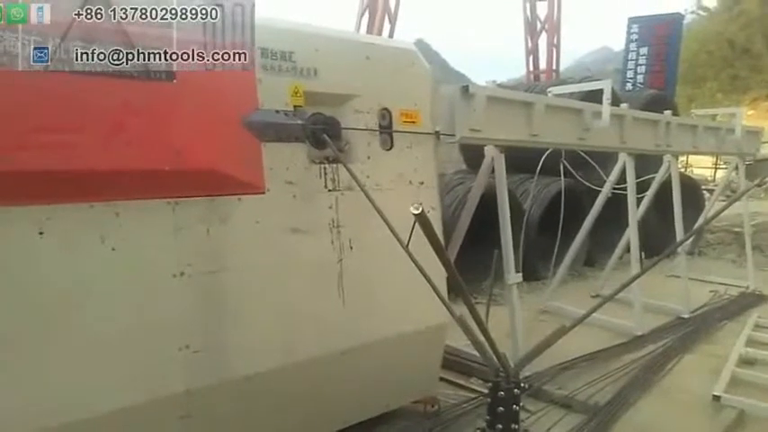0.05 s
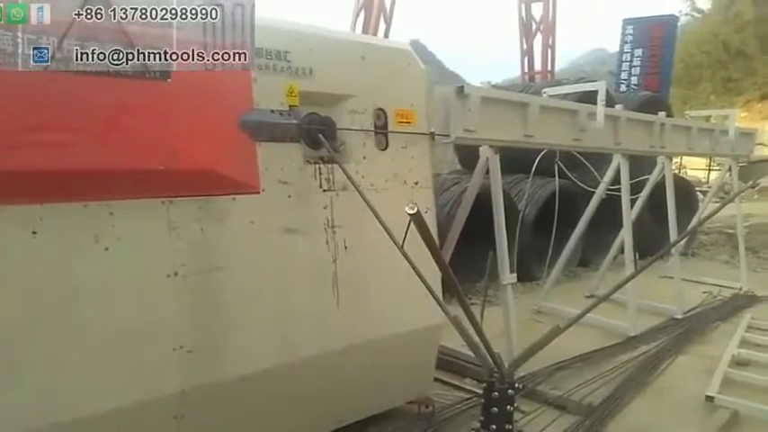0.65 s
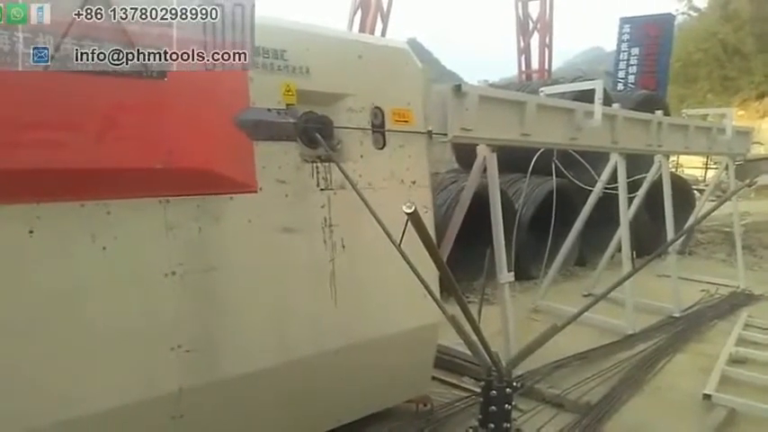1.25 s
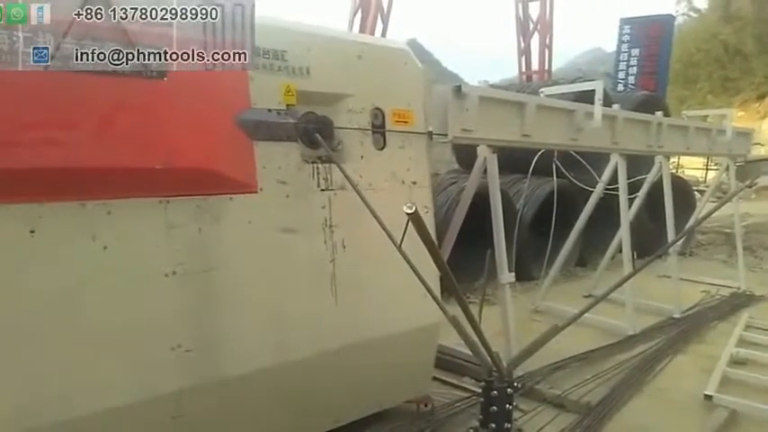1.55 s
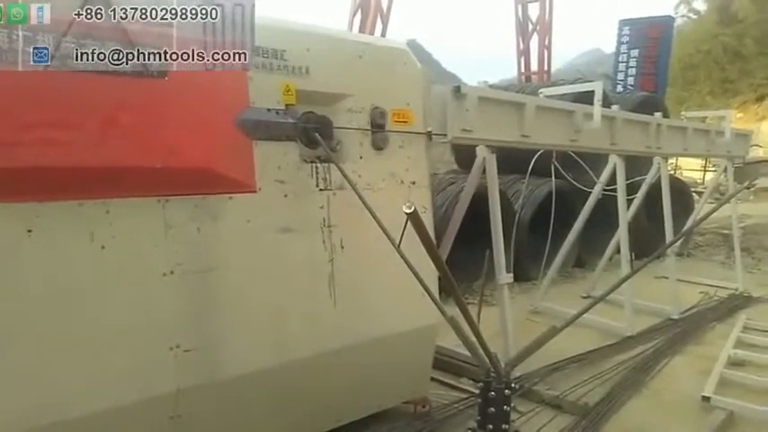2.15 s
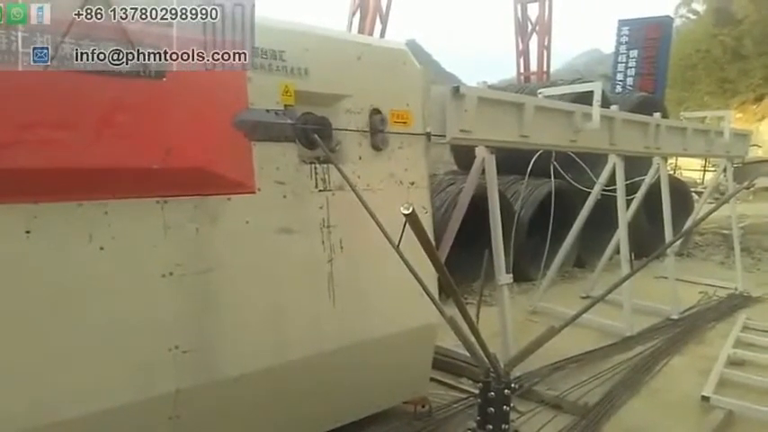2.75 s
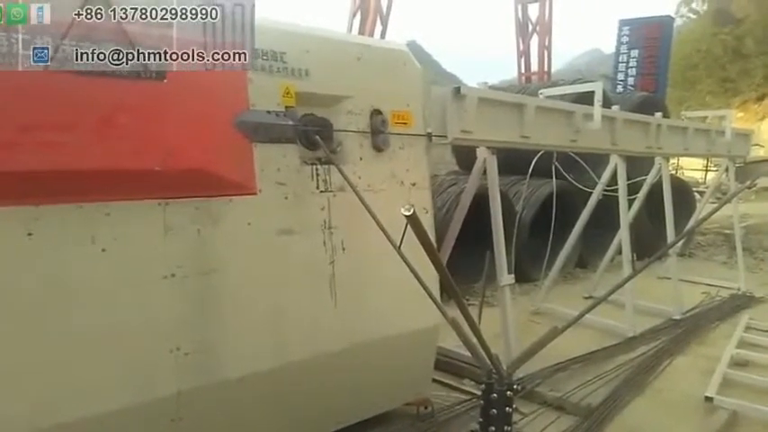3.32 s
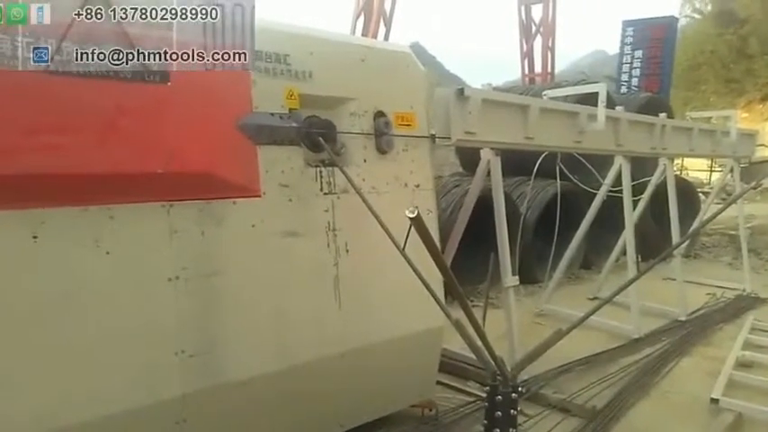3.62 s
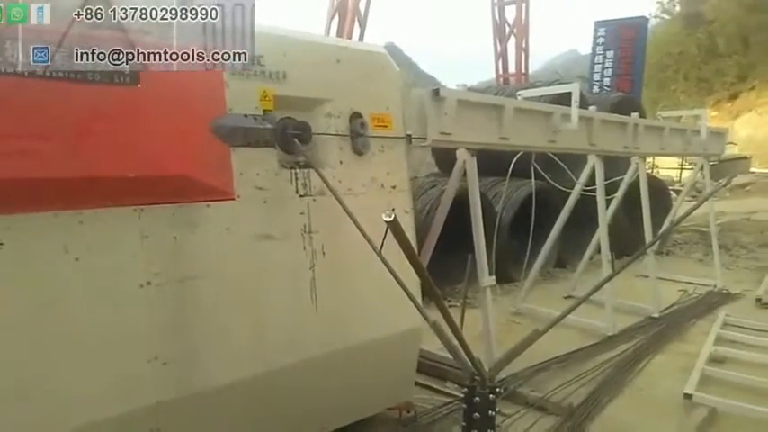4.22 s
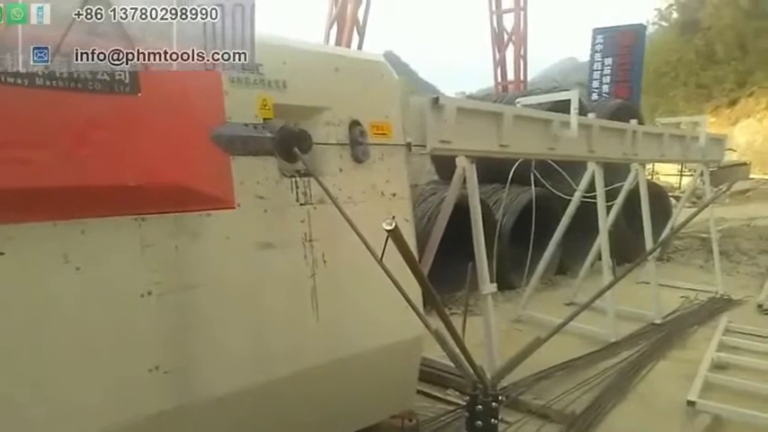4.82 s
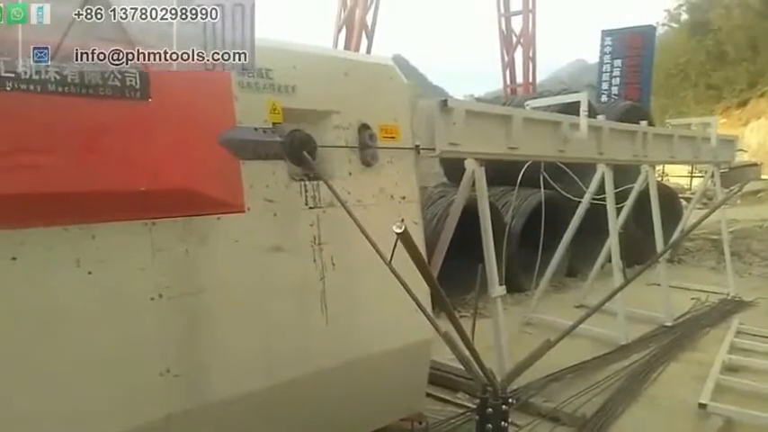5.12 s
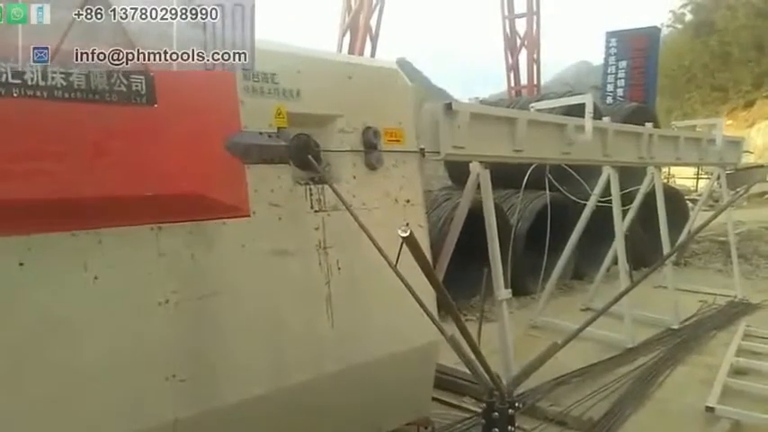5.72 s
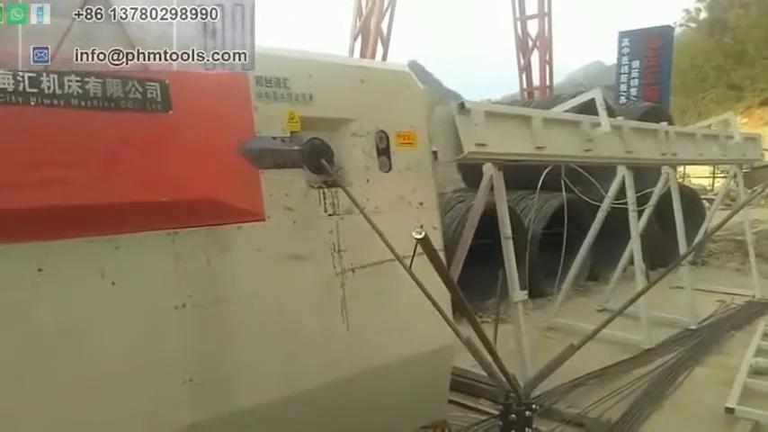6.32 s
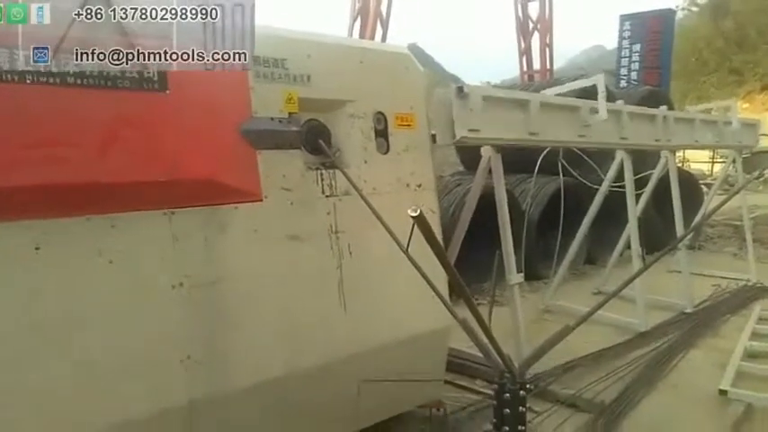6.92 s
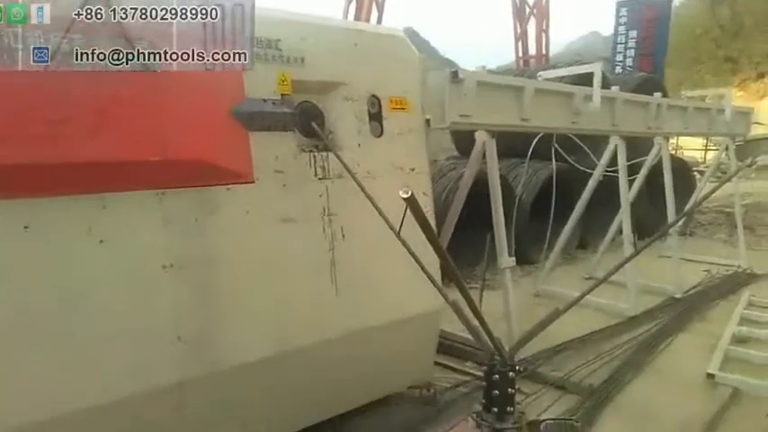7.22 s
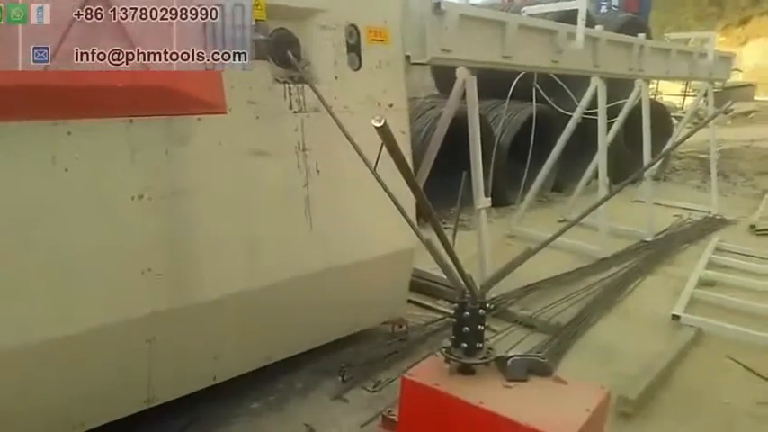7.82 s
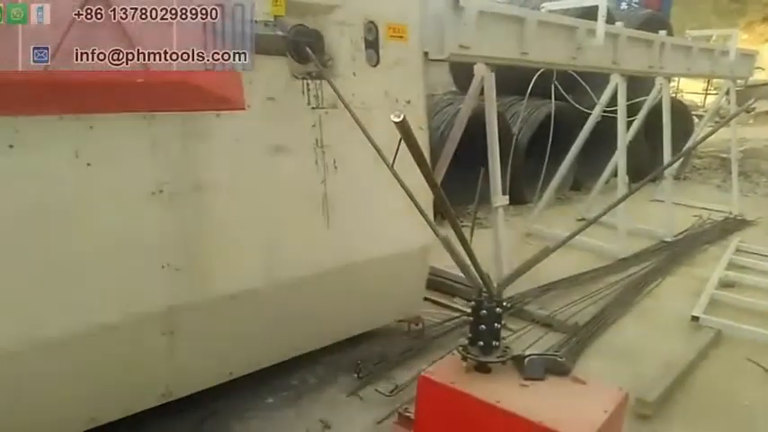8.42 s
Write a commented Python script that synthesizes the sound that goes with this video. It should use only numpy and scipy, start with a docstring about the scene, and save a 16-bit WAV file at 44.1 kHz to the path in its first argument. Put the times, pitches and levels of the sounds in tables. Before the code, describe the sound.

A bar-bending machine hums and roars through a long feed, pauses, then works in short strokes with steel scraping and clanking.

```python
"""Bar bender in an open yard

Close by, an automatic bender feeds steel bar, slows and stops, then pushes and bends it in short
strokes. Its drive hums and roars through a sheet steel cabinet; the ribbed bar scrapes, clashes and
rings in rollers and guides. Draughts buffet the hand-held phone, whose two unlike microphones each
have their own limiter."""
import sys
import numpy as np
from scipy.fft import rfft, irfft, next_fast_len
from scipy.io import wavfile
from scipy.ndimage import uniform_filter1d, minimum_filter1d, map_coordinates

SR = 44100
rng = np.random.default_rng(int(sys.argv[2]) if len(sys.argv) > 2 else 0)


def log_audio(samples):
    """Write samples as a 16-bit WAV file to the path given in sys.argv[1]."""
    # one column per channel
    frames = np.atleast_2d(samples).T
    # limit to full scale, then quantise
    limited = np.clip(frames, -1, 1)
    pcm = np.round(limited * 32767).astype(np.int16)
    wavfile.write(sys.argv[1], SR, pcm)


N = 373086

# the long feed's roar, rasp and grating, a row each: (level at full speed [dB], exponent of speed)
LONG_FEED = [(-17.5, 0.75), (-14, 1.8), (-20.5, 6.1)]
# short pushes and bends: (start [s], end [s], rise [s], base t60 [s], roar [dB], rasp [dB], grating [dB])
WORK_STROKES = [(2.353, 2.707, 0.061, .35, -55.5, -51, -62), (2.701, 2.753, 0.029, 0.35, -36.5, -32, -32),
                (3.037, 3.139, 0.12, 0.42, -8.5, 1, -8), (3.23, 3.82, 0.096, 3.1, -37, -23, -32.5),
                (3.318, 3.545, 0.2, 0.7, -14, -7, -17), (4.107, 4.261, 0.032, 2.8, -44, -28.5, -49),
                (4.155, 4.192, 0.014, 0.79, -30.5, -40, -42), (4.377, 4.464, 0.043, 1.7, -56, -28, -35.5),
                (4.523, 4.78, 0.16, 0.86, -42, -24, -33.5), (4.863, 4.916, 0.018, 1.05, -52, -28, -39.5),
                (4.975, 5.075, 0.012, 2.8, -39, -28.5, -27.5), (5.12, 5.253, 0.031, 4.6, -29, -21, -27.5),
                (5.282, 5.336, 0.05, 1.34, -23, -19, -16.5), (5.393, 5.644, 0.28, 3.9, -54.5, -15.5, -36),
                (5.826, 6.108, 0.045, 2.8, -31, -23, -28.5), (6.017, 6.064, 0.026, 0.18, -43, -18, -24),
                (6.161, 6.378, 0.021, 0.3, -25, -21.5, -19), (6.353, 6.57, 0.099, 3.5, -24, -15, -15),
                (6.512, 6.815, 0.27, 2.07, -22.5, 0, -22), (6.946, 7.184, 0.082, 1.35, -32, -11, -39),
                (7.317, 7.507, 0.085, 1.9, -56.5, -27, -44), (7.915, 8.021, 0.046, 1.3, -44, -24.5, -37),
                (8.081, 8.46, 0.18, 0.56, -22, -21.5, -29.5)]
# shares of a stroke's base t60: (roar [ratio], rasp [ratio], grating [ratio])
T60_SHARES = [0.73, 0.35, 0.51]
# the drive taking up or dropping its load: (time [s], level [dB], t60 [s])
LOAD_JOLTS = [(1.903, -10.5, 0.21), (2.72, -30.5, 0.49), (3.015, -12, 0.31), (3.19, -16.5, 0.53),
              (4.103, -32.5, 0.42), (4.474, -22, 0.28), (4.992, -18, 0.96), (5.165, -12.5, 0.21),
              (7.034, -10, 0.61), (8.104, -21.5, 0.87)]
# gear hum: (time [s], first order [dB], second order [dB], third order [dB])
GEAR_ORDERS = [(0.0, -28, -40, -41), (0.1, -23, -40, -40), (0.25, -35, -37.5, -27), (0.52, -45, -38, -35.5),
               (0.72, -31.5, -35.5, -37.5), (1.0, -29.5, -33, -51), (1.16, -39, -35, -30.5),
               (1.3, -33, -37, -35), (1.45, -30.5, -26, -36), (1.77, -48, -51, -50),
               (1.93, -31, -31, -33.5)]
# resonances of the machine and the bar: (frequency [Hz], width [Hz], level [dB])
CABINET_MODES = [(404.6, 13, 7.5), (592, 152, 1.5), (893, 37, 0), (1245, 330, 0), (1476, 51, -0.5),
                 (2840, 170, -24)]
ROLLER_TONES = [(616, 30, -16), (903, 13.93, -14), (1317, 18, -8.5), (1347, 45, -11), (2840, 120, -13.5)]
BAR_MODES = [(1620, 400, -10), (2190, 120, -11), (3090, 82, -10.5)]
# noise spectra: (frequency [Hz], relative density [dB])
ROAR_SPECTRUM = [(80, -27), (170, -6), (330, -0.5), (490, -12), (750, -0.5), (1100, -5), (1500, -8),
                 (1900, -8), (3000, -8), (5000, -20.5), (12000, -22.5)]
SLIDE_SPECTRUM = [(600, -52), (1200, -14), (1500, -4), (1800, -0.5), (3300, 0), (4500, 2), (9700, 2.5),
                  (12000, -2.5)]
HISS_SPECTRUM = [(400, -36), (2000, -40), (3500, -13), (5200, 0), (8000, -1.5), (9600, -6), (10700, 8),
                 (12000, 6)]
FLICK_SPECTRUM = [(1500, -45), (4000, -15), (6500, -1), (8200, 0), (9600, -4.5), (11000, 6.5), (12000, -2)]
GRIND_SPECTRUM = [(800, -56), (1200, -20), (1450, -9), (1750, -11.5), (2500, -10.5), (3500, -14),
                  (6000, -15.5), (12000, -28.5)]
RUMBLE_SPECTRUM = [(20, -37), (35, -12.5), (65, 5), (100, -2.5), (160, -7), (290, -11.5), (900, -41)]
YARD_SPECTRUM = [(20, -23), (80, 12), (350, 10), (700, -7), (1800, -4), (5000, -25), (12000, -10)]
THUMP_SPECTRUM = [(25, -28), (70, 13), (150, 2), (300, -24), (480, -48), (1200, -52)]
FLUTTER_SPECTRUM = [(80, -8), (190, 5), (350, -1.5), (520, -12), (1200, -47)]
# the scrape turns to a keener hiss as the bar is bent off: (time [s], share of power [0-1])
HISS_SHARE = [(6.45, 0.37), (6.7, 0.67), (7.15, 0.78), (7.5, 0.63), (8.2, 0.9)]
# the bar's contacts: (time [s], level [dB], t60 [s])
STEEL_CLASHES = [(1.875, -16, 0.35), (2.506, -30.5, 0.54), (2.702, -25, 0.28), (2.988, -19, 0.58),
                 (3.019, -8.5, 0.13), (3.762, -15, 0.13), (4.159, -13, 0.1), (4.53, -20, 0.35),
                 (4.991, -15.5, 0.11), (5.318, -18, 0.18), (6.182, -1, 0.14), (6.313, -9.5, 0.33),
                 (7.92, -39, 0.2)]
END_FLICKS = [(2.27, -40.5, 0.27), (7.375, -19, 0.24), (7.442, -14, 0.19), (7.69, -32, 0.4),
              (7.741, -29, 0.19), (7.919, -32.5, 0.2)]  # free end against the faceplate
TOOL_GRATES = [(1.304, -13.5, 0.89), (4.101, -30.5, 0.28), (4.994, -23, 0.67), (5.17, -16, 0.23),
               (6.185, -14, 0.294), (6.426, -15.5, 1.2), (8.107, -21, 0.37)]  # catching on a tool
# draughts across the phone: (start [s], end [s], level [dB])
PHONE_DRAUGHTS = [(2.007, 2.505, -46), (3.5, 3.62, -44.5), (4.17, 4.495, -35), (4.943, 5.44, -29),
                  (6.134, 6.766, -20.5), (6.798, 7.246, -28), (8.02, 8.458, -20)]
# squeals and groans in the rollers: (start [s], end [s], frequency [Hz], width [Hz], level [dB])
BAR_SQUEALS = [(0.288, 0.417, 1543, 203, -13), (1.288, 1.364, 1532, 235, -12),
               (2.118, 2.25, 1620, 150, -51), (2.71, 2.79, 1343, 468, -32.5), (3.43, 3.475, 406, 60, -12.5),
               (4.1, 4.908, 760, 69.9, -45), (4.977, 5.153, 1196, 306, -27.5),
               (5.33, 5.479, 1220, 240, -23.5), (5.84, 6.21, 996, 502, -28.5),
               (6.42, 6.658, 2153, 745, -19)]
# puffs on the microphones: (time [s], level [dB], t60 [s], left minus right [dB], flutter re thump [dB])
AIR_PUFFS = [(2.275, -29, 0.25, -1, -26), (4.215, -23, 0.39, 17, -5), (4.483, -18.5, 0.14, 22, -16),
             (5.197, -15, 0.19, 4, -17), (5.303, -18, 0.15, 10, -22), (6.126, -8.5, 0.12, 2.5, -2.5),
             (6.325, -20, 0.39, -14, 7.5), (6.397, -12, 0.18, -9, -8), (6.52, -15.5, 0.31, -10, 4),
             (6.595, -10.5, 0.19, -15, 3), (6.713, -12.5, 0.14, -14, 9), (7.294, -22, 0.18, 20, -10),
             (7.5, -10.5, 0.12, 15, -14), (7.607, -10, 0.15, 11, -16.5), (7.7, -19.5, 0.22, 19, -26),
             (7.81, -17.5, 0.14, 28, -30), (7.925, -21, 0.19, 15, -27), (8.047, -12.5, 0.16, 20, -11.5),
             (8.136, -8, 0.13, 14, -17)]
# light catches snapping in, and the bar knocking on a bending tool: (time [s], level [dB])
CATCH_CLICKS = [(2.387, -45), (2.507, -47)]
TOOL_CLANKS = [(4.995, -21), (5.176, -19.5), (6.184, -21.5), (7.038, -23)]
# what they ring with: (frequency [Hz], width [Hz], level [dB], t60 [s])
CATCH_MODES = [(2620, 730, 2, 0.16), (3830, 900, -13, .2), (5500, 1000, -4, 0.2)]
TOOL_MODES = [(1260, 38, -1.5, 0.25), (1717, 34, -10, 0.13), (1980, 35, -3, 0.07), (2300, 27, -1, 0.13),
              (3150, 30, -13, .12)]
# the whine of a guide: (time [s], pitch [Hz], level [dB])
GUIDE_WHINE = [(3.6, 1580, -70), (3.76, 1636, -30), (3.92, 1647, -38), (4.07, 1622, -46),
               (4.2, 1620, -33.5), (4.5, 1655, -42.5), (4.68, 1627, -36.5), (4.92, 1652, -43),
               (5.53, 1624, -50), (5.62, 1614, -26.5), (5.83, 1620, -39.5), (6.3, 1644, -40),
               (6.85, 1680, -28), (7.2, 1680, -37), (7.45, 1640, -44.5), (7.8, 1656, -57), (8.3, 1642, -36)]
# the guide's modes: (frequency over the whine's pitch [ratio], width [Hz], level [dB])
WHINE_MODES = [(1, 58, 0.5), (0.925, 150, -7)]
# which microphone port a sound favours: (time [s], left minus right [dB])
SCRAPE_BALANCE = [(3.55, -2.5), (3.75, 3), (4.9, 7.5), (5.1, -1), (5.6, 5), (6.1, -2), (7.5, 0), (8.3, 8)]
RUMBLE_BALANCE = [(3.7, 12), (5.0, 2), (6.1, -0.5), (6.6, -8), (7.0, -6), (7.3, 3), (8.0, 3.5)]
# likeness of the sound at the two ports: (frequency [Hz], coherence [0-1])
PORT_COHERENCE = [(50, 0.83), (130, 0.46), (280, 0.53), (590, 0.64), (1280, 0.23), (2700, 0)]
# microphone responses: (frequency [Hz], gain [dB])
LEFT_RESPONSE = [(6000, -1), (7500, 2.5), (8600, 6), (9700, 10), (11000, 4), (12100, -1)]
RIGHT_RESPONSE = [(100, -5.5), (250, -9.5), (450, -6.5), (880, -3.5), (1350, -8.5), (2100, -8.5),
                  (4000, -3.5), (6500, -4.5), (8000, -4.5), (10000, -10.5), (12100, -21)]

SLOWS_S, STOPS_S, STOP_T60_S = 1.464, 1.887, 0.63  # end of the long feed
TOP_HZ = 12200  # upper edge of the phone's band


def amp(db):
    """Decibels to gain."""
    return 10 ** (np.asarray(db) / 20)


def unit(x):
    """Scale to rms 1."""
    return x / np.sqrt(np.mean(x ** 2) + 1e-20)


def along(points, hz):
    """Read (frequency [Hz], value) points on a log axis."""
    freqs, values = np.transpose(points)
    return np.interp(np.log(hz + 1), np.log(freqs + 1), values)


def curves(rows):
    """One value per sample for each column after the time."""
    times, *columns = np.transpose(rows)
    return [np.interp(np.arange(N) / SR, times, column) for column in columns]


def wobble(rate, size=N):
    """A smooth random curve with rate knots a second."""
    knots = rng.standard_normal(int(size * rate / SR) + 4)
    coarse = map_coordinates(knots, [np.arange(0, size, 32) * rate / SR])
    return np.interp(np.arange(size), np.linspace(0, size, len(coarse)), coarse)


def filtered(x, response):
    """Filter x by a gain given as a function of frequency."""
    size = next_fast_len(N + SR // 4)
    return irfft(rfft(x, size) * response(np.fft.rfftfreq(size, 1 / SR)), size)[..., :N]


def body(spectrum, modes, hz, skirt):
    """Gain of a broad spectrum with resonances standing on it; skirt steepens their flanks."""
    peaks = sum(amp(db) ** 2 / (1 + (2 * (hz - centre) / width) ** 2) ** skirt
                for centre, width, db in modes)
    return np.sqrt(amp(along(spectrum, hz)) ** 2 + peaks)


def ripple(hz, depth_db, spacing_hz=22):
    """Countless fine modes leave narrow random peaks and dips in a spectrum."""
    knots = rng.standard_normal(SR // 8)
    return amp(depth_db * map_coordinates(knots, [hz / spacing_hz], order=1, mode="wrap"))


def shaken(spectrum, modes=(), grain=0, ripple_db=0, skirt=1):
    """Noise of countless small pushes on a body, at both ports, rms 1; grain [dB] makes them uneven."""
    def response(hz):
        angle = np.arccos(np.clip(along(PORT_COHERENCE, hz), -1, 1)) / 2
        shares = np.array([np.cos(angle), np.sin(angle)])
        return body(spectrum, modes, hz, skirt) * ripple(hz, ripple_db) * shares

    force = rng.standard_normal((2, N)) * amp(grain * wobble(700))
    mid, side = filtered(force, response)
    return unit(np.array([mid + side, mid - side]))


def rough_tone(centre_hz, width_hz, size=N, apart_rad=1.0):
    """One ringing mode, wavering in strength and phase, partly alike at both ports."""
    waver = lambda: wobble(width_hz, size) + 1j * wobble(width_hz, size)
    carrier = np.exp(2j * np.pi * np.cumsum(centre_hz * np.ones(size)) / SR)
    left = waver()
    right = np.cos(apart_rad) * left + np.sin(apart_rad) * waver()
    return unit(np.real(np.array([left, right]) * carrier))


def wandering(x, share, rate=4):
    """Resonances drift up and down by a share of their pitch as the bar moves."""
    position = np.cumsum(1 + share * wobble(rate))
    return np.array([map_coordinates(port, [position], mode="mirror") for port in x])


def placed(x, side_db):
    """Lean a stereo sound towards one port, keeping the sum of their powers."""
    gains = np.array([amp(side_db / 2), amp(-side_db / 2)])
    return x * gains / np.sqrt(np.mean(gains ** 2, axis=0))


def strength(sustain, blows, rise_s):
    """Envelope of a sustained level plus blows that rise and die away, added in power."""
    power = sustain ** 2 * np.ones(N)
    for time, db, t60 in blows:
        start = int(time * SR)
        t = np.arange(min(2 * SR, N - start)) / SR
        power[start:start + len(t)] += (amp(db - 60 * t / t60) * (1 - np.exp(-t / rise_s))) ** 2
    return np.sqrt(power)


def held(t, start, end, rise, t60):
    """Envelope that swells from start, holds until end and dies away."""
    swell = np.sin(np.pi / 2 * np.clip((t - start) / rise, 0, 1)) ** 2
    return swell * amp(-60 * np.maximum(t - end, 0) / t60)


def running(t):
    """1 while the long feed runs, dying away once it stops."""
    return amp(-60 * np.maximum(t - STOPS_S, 0) / STOP_T60_S)


def efforts(creep_speed=0.43):
    """Strength of roar, rasp and grating: the long feed by its speed, then stroke after stroke."""
    t = np.arange(0, N / SR, .001)
    speed = np.interp(t, [SLOWS_S, STOPS_S], [1, creep_speed])
    power = np.array([(amp(db) * speed ** exponent * running(t)) ** 2 for db, exponent in LONG_FEED])
    for start, end, rise, t60, *levels in WORK_STROKES:
        power += [(amp(db) * held(t, start, end, rise, t60 * share)) ** 2
                  for db, share in zip(levels, T60_SHARES)]
    return curves(np.column_stack([t, *np.sqrt(power)]))


def drive(roar):
    """The drive shakes the cabinet's panels, with a jolt at each change of load."""
    level = strength(roar, LOAD_JOLTS, rise_s=.014) * amp(0.47 * wobble(35))
    return level * shaken(ROAR_SPECTRUM, CABINET_MODES, grain=0.7, ripple_db=1.6)


def gear_hum(mesh_hz=135.7, shaft_hz=18.3, throb=0.61, drift=0.0027, gain_db=10):
    """Meshing gears hum through the long feed, wavering and throbbing with the shaft's turn."""
    t = np.arange(N) / SR
    phase = 2 * np.pi * np.cumsum(mesh_hz * (1 + drift * wobble(7))) / SR
    out = np.zeros(N)
    for order, db in enumerate(curves(GEAR_ORDERS), 1):
        tone = np.sqrt(2) * np.sin(order * phase + 0.6 * wobble(20)) * amp(wobble(11))
        turning = 1 + throb * np.sin(2 * np.pi * shaft_hz * t + 2 * wobble(4.4))
        out += amp(db + gain_db) * tone * turning
    return running(t) ** 1.27 * out


def rollers(roar):
    """The feed rollers whine roughly while the long feed runs."""
    feeding = np.interp(np.arange(N) / SR, [1.93, 2.1], [1, 0])
    return feeding * roar * sum(amp(db) * rough_tone(hz, width) for hz, width, db in ROLLER_TONES)


def rattle(roar, per_s=130, middle_hz=1800, spread_octaves=.6, t60=.11, gain_db=-7):
    """Loose bars and panels chatter under load: each contact rings briefly at its own pitch."""
    count = int(per_s * N / SR)
    when, right_phase = rng.random((count, 2)).T[..., None]
    pitch, force = rng.standard_normal((count, 2)).T[..., None]
    n = np.arange(int(t60 * SR))
    hz = np.minimum(middle_hz * 2 ** (spread_octaves * pitch), TOP_HZ)
    fade = amp(2 * force - 60 * n / len(n))
    places = ((when * N).astype(int) + n).ravel()
    ports = []
    for phase in (0, right_phase):
        pings = fade * np.sin(2 * np.pi * (hz * n / SR + phase))
        ports.append(np.bincount(places, pings.ravel(), N)[:N])
    return amp(gain_db) * roar * unit(np.array(ports))


def bar_scrape(sliding):
    """Bar ribs rasp over the rollers in uneven flurries; loose steel clashes and the free end flicks."""
    keen, = curves(HISS_SHARE)
    dull = shaken(SLIDE_SPECTRUM, grain=0.5, ripple_db=2.2)
    hiss = shaken(HISS_SPECTRUM, grain=0.8, ripple_db=2.8)
    rasp = wandering(np.sqrt(1 - keen) * dull + np.sqrt(keen) * hiss, share=.014)
    flurries = amp(0.9 * wobble(22) + 1.2 * wobble(90))
    flicks = strength(0, END_FLICKS, rise_s=.002) * shaken(FLICK_SPECTRUM, grain=1.5)
    level = strength(sliding, STEEL_CLASHES, rise_s=.0035)
    return placed(amp(-2.5) * flurries * (level * rasp + flicks), curves(SCRAPE_BALANCE)[0])


def bar_ring(grating):
    """The rubbed bar rings in modes that drift as its free length changes."""
    level = strength(grating, TOOL_GRATES, rise_s=.003)
    modes = shaken(GRIND_SPECTRUM, BAR_MODES, grain=1.5, ripple_db=2.6, skirt=2)
    return level * wandering(modes, share=.015) * amp(1.1 * wobble(45))


def rumble(roar, frame_db=-20.5):
    """The frame shakes with the drive and draughts cross the phone: a lumpy low rumble."""
    t = np.arange(0, N / SR, .001)
    gusts = sum((amp(db) * held(t, start, end, rise=0.08, t60=1.7)) ** 2
                for start, end, db in PHONE_DRAUGHTS)
    wind_power, = curves(np.column_stack([t, gusts]))
    level = np.sqrt(wind_power + (amp(frame_db) * roar) ** 2)
    lumps = amp(2.2 * wobble(24))
    return placed(level * lumps * shaken(RUMBLE_SPECTRUM), curves(RUMBLE_BALANCE)[0])


def yard():
    """Faint, steady noise of the open yard all round."""
    return amp(-49.5) * shaken(YARD_SPECTRUM)


def squeals():
    """Under load the bar sticks and slips, and one mode swells and fades."""
    out = np.zeros((2, N))
    for start, end, hz, width, db in BAR_SQUEALS:
        span = out[:, int(start * SR):int(end * SR)]
        size = span.shape[1]
        swell = np.sqrt(np.sin(np.pi * np.arange(size) / size))
        span += amp(db) * swell * rough_tone(hz, width, size)
    return out


def puffs(rise_s=0.0076):
    """Air right on the microphones thumps one port more than the other; sharp puffs flutter higher up."""
    thump, flutter = shaken(THUMP_SPECTRUM), shaken(FLUTTER_SPECTRUM)
    out = np.zeros((2, N))
    for time, db, t60, side_db, flutter_db in AIR_PUFFS:
        start = int(time * SR)
        n = np.arange(start, min(N, start + SR // 2))
        t = (n - start) / SR
        level = amp(db - 60 * t / t60) * (1 - np.exp(-t / rise_s))
        air = thump[:, n] + amp(flutter_db) * flutter[:, n]
        out[:, n] += placed(level * air, np.array([side_db]))
    return out


def knocks(blows, modes, rise_s=0.00107):
    """Each blow sets the modes of a steel part ringing."""
    out = np.zeros((2, N))
    t = np.arange(SR // 2) / SR
    for time, db in blows:
        tone = sum(amp(db + level - 60 * t / t60) * rough_tone(hz, width, len(t))
                   for hz, width, level, t60 in modes)
        start = int(time * SR)
        out[:, start:start + len(t)] += tone * (1 - np.exp(-t / rise_s))
    return out


def guide_whine():
    """A guide with the bar hanging in it sings hoarsely in two close, wavering modes."""
    hz, db = curves(GUIDE_WHINE)
    pitch = hz * (1 + .007 * wobble(14))
    swells = amp(db + 1.6 * wobble(30))
    return swells * sum(amp(level) * rough_tone(ratio * pitch, width)
                        for ratio, width, level in WHINE_MODES)


def scene():
    """Machine, wind and yard as they reach the phone's two ports."""
    roar, sliding, grating = efforts()
    feed = drive(roar) + gear_hum() + rollers(roar) + rattle(roar)
    bar = bar_scrape(sliding) + bar_ring(grating) + guide_whine() + squeals()
    blows = knocks(TOOL_CLANKS, TOOL_MODES) + knocks(CATCH_CLICKS, CATCH_MODES)
    return feed + bar + blows + rumble(roar) + puffs() + yard()


def limiter(x, ceiling_db=-9, sense_s=0.015, hold_s=0.011):
    """Each channel is turned down while its short-term level passes the ceiling."""
    level = np.sqrt(np.abs(uniform_filter1d(x ** 2, int(sense_s * SR))) + 1e-12)
    needed = np.minimum(1, amp(ceiling_db) / level)
    span = int(hold_s * SR)
    return x * uniform_filter1d(minimum_filter1d(needed, span), span)


def record(dry):
    """The phone's left port resonates in the treble; its right microphone is weaker, duller, inverted."""
    response = lambda hz: np.array([amp(along(LEFT_RESPONSE, hz)), -amp(along(RIGHT_RESPONSE, hz))])
    limited = limiter(filtered(dry, response))
    soft_clipped = limited / (1 + np.abs(limited / .85) ** 8) ** (1 / 8)
    return filtered(soft_clipped, lambda hz: 1 / np.sqrt(1 + (hz / TOP_HZ) ** 300))


dry = scene()
out = record(dry)
log_audio(out)
```